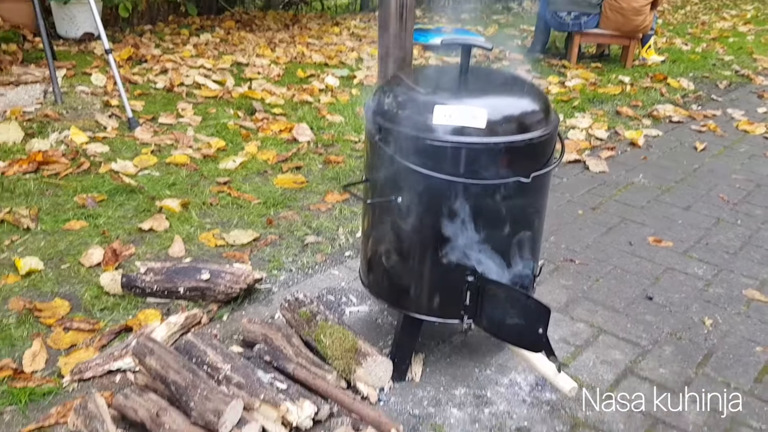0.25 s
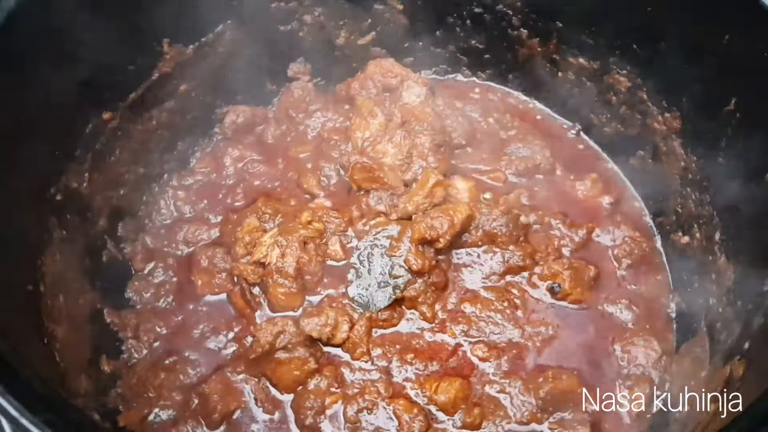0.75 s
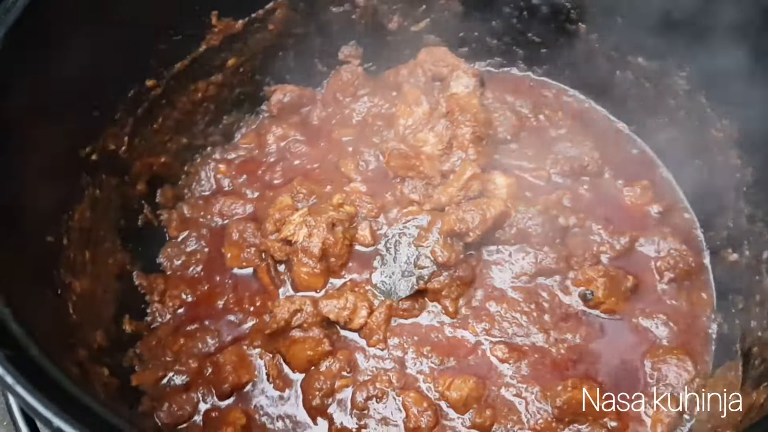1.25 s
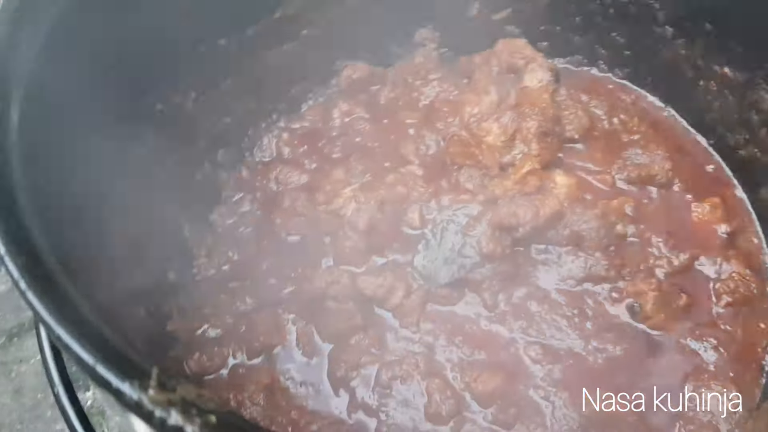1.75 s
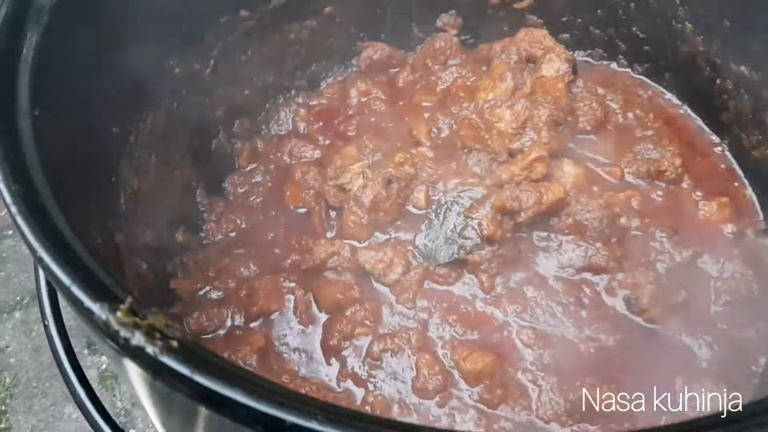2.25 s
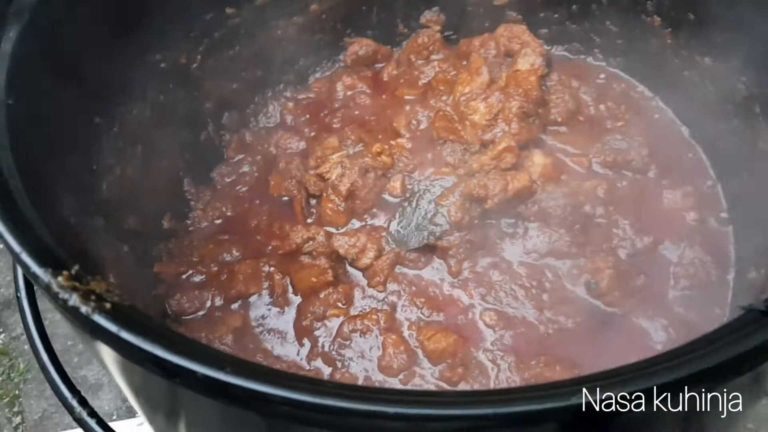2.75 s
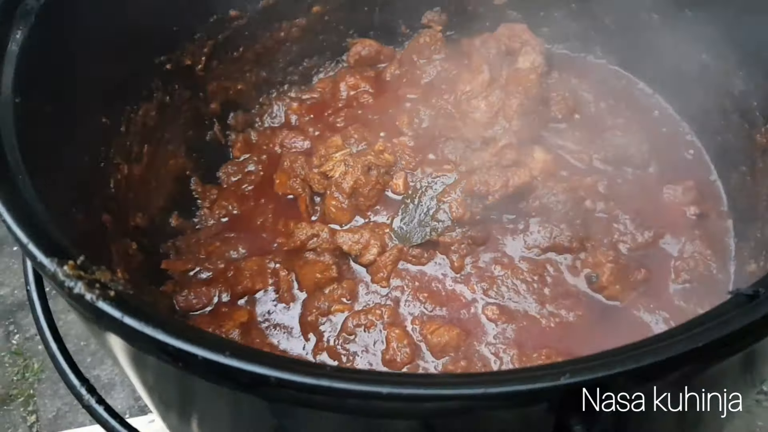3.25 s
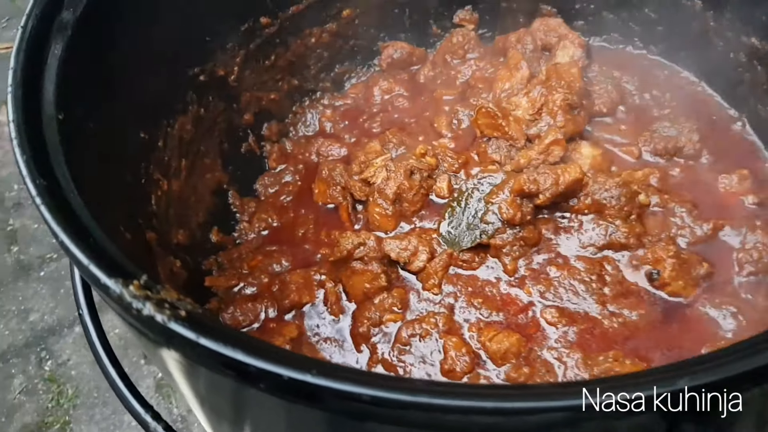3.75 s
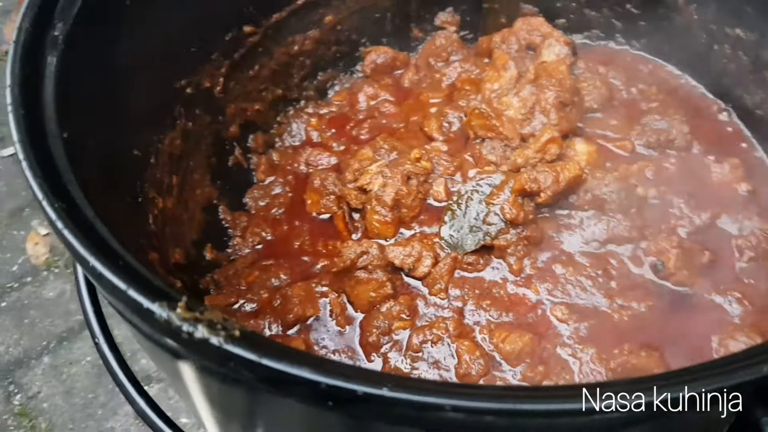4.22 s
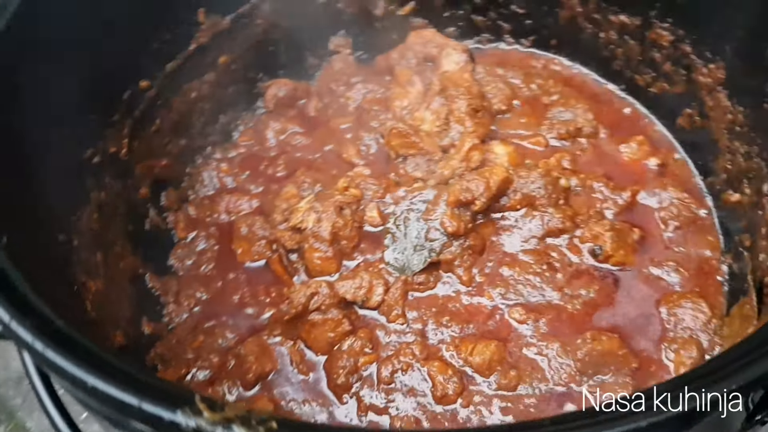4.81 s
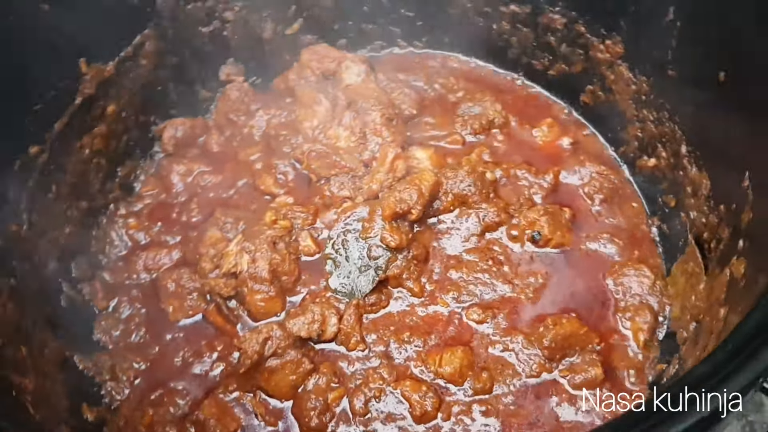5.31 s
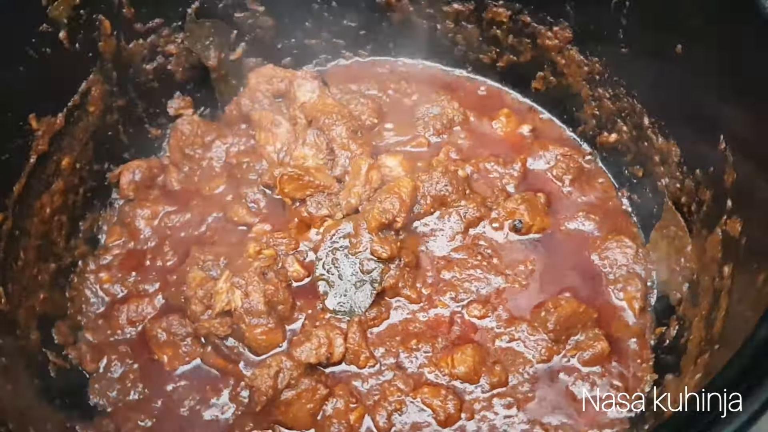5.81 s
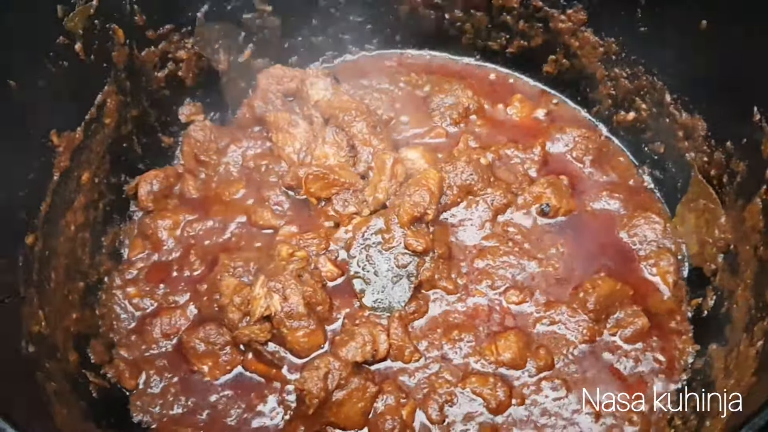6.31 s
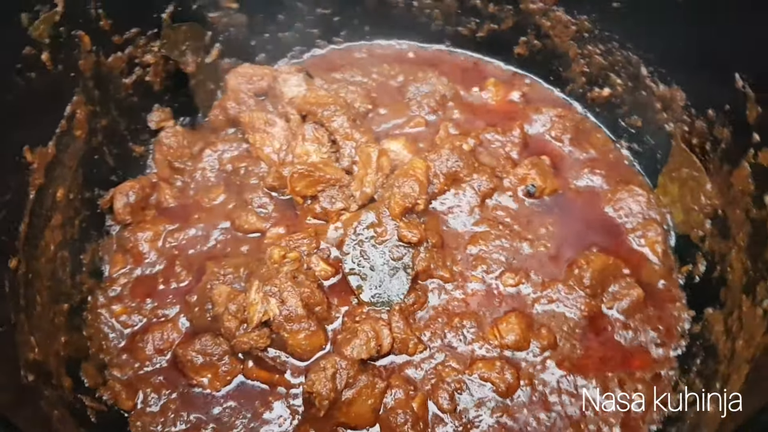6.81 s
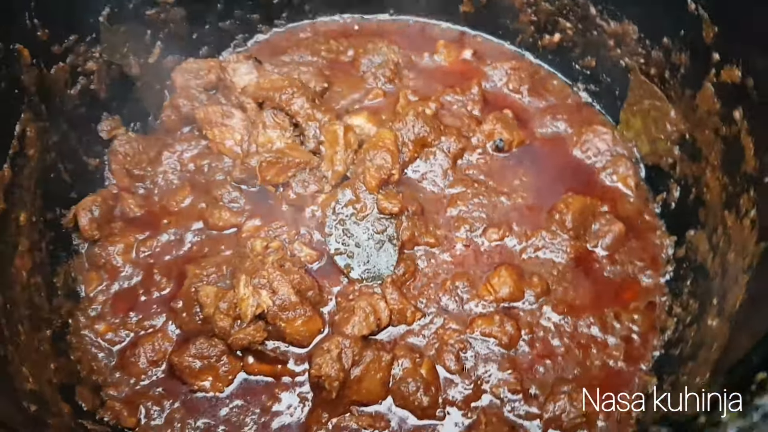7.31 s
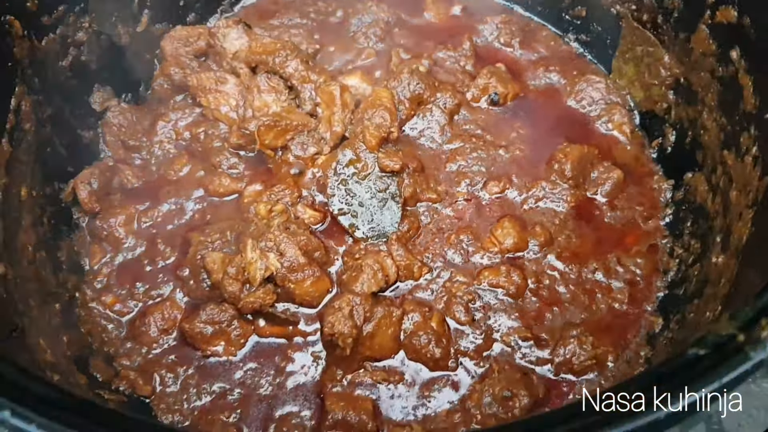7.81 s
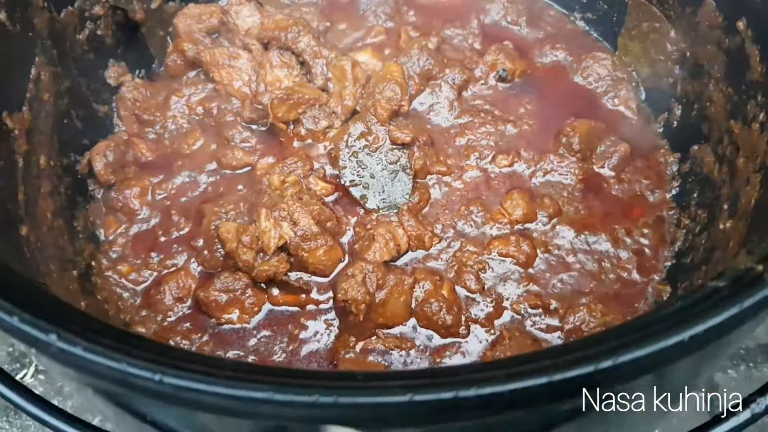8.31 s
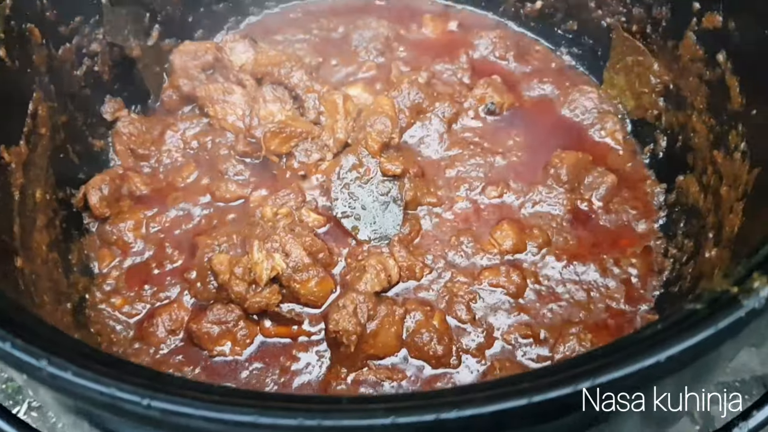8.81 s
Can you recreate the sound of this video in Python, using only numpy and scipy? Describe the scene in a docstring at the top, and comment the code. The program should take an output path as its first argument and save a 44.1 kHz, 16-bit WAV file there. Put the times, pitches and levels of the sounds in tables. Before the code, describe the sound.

A faint low rumble and a brief scratchy two-stroke creak open, cut by a tiny silence. Close, crackling sizzle with sharp spits swells for about a second, ending in a heavy steamy burst. Then thick stew bubbles slowly in a deep pot, each bubble a wet plop with a dull puff and a soft blip. A faint gurgle and hiss continue beneath. Outdoors, very close stereo microphone, buffeted by steam.

```python
"""Large bubbles burst about twice a second in a big pot of thick stew outdoors: skin tears with wet plops and splutter,
steam puffs out as noise that brightens with its flow, a duller wake buffets mostly the right microphone port, a vent plips.
Behind them a band-noise and bubble-pop simmer murmurs and sizzles, with frying swells on the hot wall and ringing spits.
A short creak of stick-slip clicks over a low rumble comes first, then a close flare of sizzling and a brief silence."""
import sys
import numpy as np
from scipy import signal
from scipy.io import wavfile
from scipy.ndimage import uniform_filter1d, minimum_filter1d

SR = 44100
rng = np.random.default_rng(int(sys.argv[2]) if len(sys.argv) > 2 else 0)


def transcribe(u):
    """Save the signal u as a 16-bit wav file named by the first command-line argument.

    u: samples, shape (n,) or (channels, n), limited to [-1, 1]; the rate is SR.
    q: integer samples, one column per channel.
    """
    v = np.clip(np.atleast_2d(u).T, -1, 1)
    q = np.round(v * 32767).astype(np.int16)
    wavfile.write(sys.argv[1], SR, q)


N = 399590

# brief silence, with every sound muted: [start t/s, end t/s]
PAUSE = (.569, .595)
# bursting bubbles: [peak t/s, puff level/dB, brightness f/Hz, swell t/s, low thump level/dB,
# left-right level/dB, wake level/dB]
BURSTS = [(1.458, -9.5, 790, 0.0091, 12, -42.5, -33), (2.836, -15, 921, 0.026, 3, 5.5, -34),
          (3.319, -25.5, 564, 0.023, 9.5, 2, -39), (3.719, -19.5, 1158, 0.012, -9.5, 1, -27),
          (4.209, -41.5, 1050, 0.011, -2, -25, -67), (5.143, -25.5, 634, 0.021, 13, 2.5, -45),
          (5.489, -32.5, 560, 0.018, 25.5, 2.5, -61), (5.905, -35, 1010, 0.017, 13, -9, -38.5),
          (6.356, -16.5, 824, 0.024, 2.5, -1, -33), (6.73, -28, 400, 0.048, 9, -4.5, -30.5),
          (7.177, -26.5, 437, 0.019, 10.5, 0, -41.5), (7.61, -31, 570, 0.016, 6.5, 30, -42.5),
          (8.0, -43.5, 390, 0.023, 20, -11, -45.5), (8.414, -17, 890, 0.015, 15, 3.5, -22),
          (8.846, -22.5, 1020, 0.017, -15, 25.5, -43.5)]


def from_db(db):
    """Decibels to gain."""
    return 10 ** (np.asarray(db) / 20)


def rms_one(x):
    """Scale to rms 1."""
    return x / np.sqrt(np.mean(x ** 2) + 1e-20)


def in_time(rows):
    """The columns of a curve at every sample."""
    s, *columns = np.transpose(rows)
    return [np.interp(np.arange(N) / SR, s, column) for column in columns]


def at_hz(points, hz):
    """Read a spectrum on a log-frequency axis."""
    point_hz, values = np.array(points)[:, 0], np.array(points)[:, 1]
    return np.interp(np.log(hz), np.log(point_hz), values)


def panned(pan_db):
    """Left and right gains of constant power; positive leans left."""
    return rms_one(from_db(np.array([[.5], [-.5]]) * pan_db))


def drift(rate, size=N):
    """Slow random wandering of rms 1: noise through a two-pole low-pass at the rate (Hz), one point per 20 samples."""
    r = np.exp(-40 * np.pi * rate / SR)
    noise = rng.standard_normal(size // 20 + 2002)
    slow = signal.lfilter([1], [1, -2 * r, r * r], noise)[2000:]  # skip the filter's start
    return np.interp(np.arange(size) / 20, np.arange(len(slow)), rms_one(slow))


def ring(clicks, hz, t60):
    """A resonance: a unit click sets a sine ringing from height 1, down 60 dB after t60 (s)."""
    r, w = from_db(-60 / (t60 * SR)), 2 * np.pi * hz / SR
    return signal.lfilter([0, np.sin(w)], [1, -2 * r * np.cos(w), r * r], clicks + 1e-18)


def cut(x, hz, kind, order=2):
    """Butterworth low-, high- or band-pass."""
    return signal.sosfilt(signal.butter(order, hz, kind, fs=SR, output="sos"), x)


def held(start, end, attack, release):
    """An envelope that rises to 1, holds until its end and dies away exponentially (all in s)."""
    t = np.arange(N) / SR
    return np.clip((t - start) / attack, 0, 1) * np.exp(-np.clip((t - end) / release, 0, 20))


def add(out, s, sound):
    """Mix a short stereo sound in at its time."""
    at = round(s * SR)
    out[:, at:at + sound.shape[1]] += sound[:, :N - at]


def noise_bands(low_hz, count):
    """Half-octave bands taken in turn from two unrelated stereo noises, power 1 per kHz: (centre Hz, noise)."""
    white = rng.standard_normal((2, 2, N)) * np.sqrt(SR / 2000)
    for k in range(count):
        low = low_hz * 2 ** (k / 2)
        high = min(low_hz * 2 ** ((k + 1) / 2), SR / 2 - 10)
        yield np.sqrt(low * high), cut(white[k % 2], [low, high], "band", order=3)


def crackle(per_s, spread_db, low_hz, high_hz, cycles, clump_db):
    """Tiny bubbles pop at random, in clumps, with uneven sizes and 20 pitches, each ringing for some cycles; rms 1."""
    at = np.flatnonzero(rng.random(N) < per_s * from_db(clump_db * drift(5)) / SR)
    sizes = from_db(spread_db * np.minimum(rng.exponential(1, len(at)), 4))
    sizes = sizes * rng.choice([-1, 1], len(at))
    dealt = rng.integers(0, 20, len(at))  # which pitch each pop gets
    out = np.zeros(N)
    for k, hz in enumerate(np.geomspace(low_hz, high_hz, 20)):
        clicks = np.zeros(N)
        clicks[at] = sizes * (dealt == k)
        out += ring(clicks, hz, cycles / hz)
    return rms_one(cut(out, low_hz, "high", order=1))


def hollow(x):
    """The air in the pot rings along: resonant peaks are added to whatever sounds inside it."""
    # resonances of the pot's air: [f/Hz, width f/Hz, level/dB against the direct sound]
    air_modes = [(376, 240, -3.5), (1068, 38, -9.5), (1880, 11, -6.5)]
    out = x
    for hz, width, db in air_modes:
        out = out + from_db(db) * signal.lfilter(*signal.iirpeak(hz, hz / width, fs=SR), x)
    return out


def fire():
    """A low band-noise rumble at the start, probably the draught of the wood fire under the pot."""
    rumble = rms_one(cut(rng.standard_normal((2, N)), [65, 190], "band"))
    # holds until the brief silence, then fades
    return from_db(-47) * rumble * held(0, PAUSE[0], attack=1 / SR, release=0.34)


def wash(spectrum, pan, bands, patchy_db, rate):
    """Stereo noise shaped band by band, each band flickering on its own; rms 1."""
    # how alike the two microphone ports hear: [f/Hz, likeness 0-1]
    port_likeness = [(60, 0.97), (130, 0), (290, 0.98), (3100, 0)]
    out = 0
    for hz, (mid, side) in bands:
        alike = np.clip(at_hz(port_likeness, hz), -1, 1)
        gain = from_db(at_hz(spectrum, hz) + patchy_db * drift(rate)) * panned(at_hz(pan, hz))
        stereo = np.sqrt(1 + alike) * mid + np.sqrt(1 - alike) * side * [[1], [-1]]
        out = out + gain * stereo
    return rms_one(out)


def simmer(bands):
    """A gurgling murmur from deep in the pot and a sizzle of fine bubbles on the hot wall, with one close flare."""
    # level of the simmer: [t/s, level/dB]
    simmer_level = [(0, 4.5), (1.45, 10), (1.7, -2.5), (3.7, -7.5), (4.3, -0.5), (4.9, -4), (5.3, 4.5),
                    (8.3, 5.5)]
    # spectra of murmur and hiss: [f/Hz, level/dB per Hz, relative]
    murmur_spectrum, hiss_spectrum = [(30, -4.5), (64, 12.5), (216, -2.5), (673, -11.5), (1345, -18.5)], [(1900, -6.5), (2700, -9), (3800, -3), (5400, -4.5),
                                                      (10800, -13.5), (15200, -7.5)]
    # where they lie between the ports: [f/Hz, left-right level/dB]
    murmur_pan, hiss_pan = [(60, -8), (200, 1), (500, 3), (1500, 1.5)], [(2700, -0.5), (4400, 10), (7600, 31.5), (10800, 25.5),
                                                (15000, -1.5)]
    murmur_db, sizzle_db, near_db = -59.5, -72.5, -79  # where the level curve reads 0 dB
    flare_db = -57

    murmur = wash(murmur_spectrum, murmur_pan, bands[:12], patchy_db=2, rate=20)
    gurgle = crackle(per_s=61, spread_db=3.0, low_hz=295.5, high_hz=800, cycles=31, clump_db=3.5)
    deep = hollow(murmur + from_db(-9.5) * gurgle)

    highs = wash(hiss_spectrum, hiss_pan, bands[12:], patchy_db=1, rate=20)
    ticks = crackle(per_s=270, spread_db=4.5, low_hz=4640, high_hz=13800, cycles=20.0, clump_db=3.5)
    hiss = from_db(-1.13 + 2.0 * drift(7.2)) * highs + from_db(-4.5) * ticks * panned(42)
    far = crackle(per_s=260, spread_db=11.5, low_hz=3200, high_hz=5000, cycles=18, clump_db=4.0)
    far = from_db(-7.0 + 2.0 * drift(21)) * far * panned(3.8)
    near = crackle(per_s=3000, spread_db=5.5, low_hz=2050, high_hz=8400, cycles=16, clump_db=3.5) * panned(44.0)
    sizzle = from_db(sizzle_db) * (hiss + far) + from_db(near_db) * near

    coarse = crackle(per_s=1100, spread_db=0.0, low_hz=700, high_hz=3200, cycles=3.1, clump_db=2.0) * panned(9.3)
    flare = held(start=0.56, end=1.5, attack=0.13, release=0.013) * from_db(flare_db + 3.5 * drift(30))
    steady = from_db(murmur_db) * deep + sizzle
    return from_db(in_time(simmer_level)[0]) * steady + flare * (near + from_db(-5.0) * coarse)


def swells(pan_db=1.0, half_s=0.12):
    """Patches of dense frying come and go in bell-shaped swells where the sauce wets the hot wall."""
    # sauce washing up the wall: [peak t/s, level/dB]
    washes_up = [(6.15, -66.5), (6.92, -68), (8.25, -66.5)]
    t = np.arange(N) / SR
    wetted = 0
    for s, db in washes_up:
        wetted = wetted + from_db(db) * np.exp(-np.minimum(((t - s) / half_s) ** 2, 20))
    frying = crackle(per_s=990, spread_db=5.5, low_hz=2215, high_hz=4530, cycles=62, clump_db=4.5)
    return wetted * cut(frying, 4300, "low", order=4) * panned(pan_db)


def creak(uneven_db=1.5, pan_db=22.0):
    """Stick-slip: two strokes of sharp slips ring a few modes, with a short squeal at the start and a few late jolts."""
    # strokes: [start t/s, end t/s, unevenness of the slips 0-1, level/dB]
    strokes = [(0.158, 0.383, .2, -48), (0.412, 0.568, .3, -50.5)]
    # speed: [t/s, slip rate f/Hz]
    slip_rate = [(.19, 290), (.275, 205), (.37, 190), (.4, 130), (.56, 190)]
    # what the creak rings with: [f/Hz, level/dB, 60 dB decay t/s]
    creak_modes = [(2300, 9, 0.0076), (2800, 17, 0.0011), (3930, 4.5, 0.0082), (6250, 0.5, 0.0043)]
    # harder slips at the end: [t/s, level/dB]
    hard_slips = [(0.471, -27.5), (.541, -25), (0.559, -27.5)]

    t, slips = np.arange(N) / SR, np.zeros(N)
    for start, end, jitter, db in strokes:
        per_s = in_time(slip_rate)[0] * np.exp(jitter * drift(70))
        clicks = np.diff(np.floor(np.cumsum(per_s) / SR), prepend=0)  # one click per whole cycle
        slips += from_db(db) * (t > start) * (t < end) * clicks
    body = 0
    for k, (hz, mode_db, t60) in enumerate(creak_modes):
        struck = slips * from_db(mode_db + uneven_db * drift(55))
        body = body + (-1) ** k * ring(struck, hz, t60)
    body = cut(cut(body, 8300, "low", order=6), 1550, "high", order=6)

    squeal = np.sin(2 * np.pi * np.cumsum(1100 * (1 + 0.044 * drift(110))) / SR)
    squeal = squeal * from_db(-46.5) * held(start=0.153, end=0.16, attack=0.0082, release=0.077)

    jolts = np.zeros(N)
    for s, jolt_db in hard_slips:
        jolts[round(s * SR)] = from_db(jolt_db)
    knocks = ring(jolts, 630, 0.006) + ring(jolts, 5500, 0.00077)
    return (body + knocks) * panned(pan_db) + squeal


def spits(hz=3700, pitch_spread=0.099, cycles=8.6, clicks_per_s=900, splutter_s=0.012, after_share=0.41, pan_db=23.0):
    """A droplet snaps on the hot metal and scatters smaller snaps, ringing at three pitches around one of its own."""
    # sauce spitting on the hot wall: [t/s, level/dB]
    droplets = [(.803, -37), (.921, -31.5), (0.988, -35.5), (1.034, -32), (1.111, -37), (1.174, -32.5),
                (1.2335, -34), (1.318, -33.5), (2.246, -49.5), (4.069, -48.5), (4.296, -50.5), (5.332, -50),
                (5.901, -37), (6.087, -45), (6.533, -38), (7.601, -43.5), (8.133, -44), (8.363, -43),
                (8.795, -46)]
    out, t = np.zeros((2, N)), np.arange(SR // 20) / SR
    for s, db in droplets:
        burst = 0
        for pitch in hz * np.exp(pitch_spread * (rng.standard_normal() + np.arange(-1, 2))):
            scattered = (rng.random(len(t)) < clicks_per_s / SR) * rng.standard_normal(len(t))
            clicks = after_share * scattered * np.exp(-t / splutter_s)
            clicks[rng.integers(SR // 1000)] = 1  # the first snap, within 1 ms
            burst = burst + ring(clicks, pitch, cycles / pitch)
        add(out, s, from_db(db) * burst / np.abs(burst).max() * panned(pan_db))
    return out


def pop(hz, decay, rise=0.35, wobble=0.073, tear=.42, tear_reach=1.21, attack=0.00063):
    """A cavity opens: it rings for a few cycles, wobbling and rising in pitch, with a rasp of torn sauce."""
    t = np.arange(SR // 20) / SR
    pitch = hz * np.exp(rise * (np.tanh(t / decay / 2) - .5) + wobble * drift(270, size=len(t)))
    tone = np.sin(2 * np.pi * np.cumsum(pitch) / SR)
    rasp = cut(rng.standard_normal((2, len(t))), tear_reach * hz, "low", order=3)
    rasp = rms_one(cut(rasp, hz / 2, "high"))
    envelope = (1 - np.exp(-t / attack)) * np.exp(-t / decay)
    return envelope * (tone + tear * rasp)


def plips(hz=1050, decay_s=0.0017, pitch_spread=0.14, wall_share=0.028, wall_s=0.015, pan_db=4.5):
    """The closing vent gives a short soft blip, each at its own pitch, smeared by reflections from the pot wall."""
    # vents slapping shut after a burst: [t/s, level/dB]
    closings = [(1.619, -39), (1.645, -34.5), (3.4525, -39.5), (5.1905, -23.5), (5.613, -31), (6.04, -30.5),
                (6.464, -25.5), (6.873, -23.5), (7.299, -25), (7.7158, -26), (8.1472, -25.5), (8.563, -31),
                (8.9871, -33)]
    out = np.zeros((2, N))
    for s, db in closings:
        pitch = hz * np.exp(pitch_spread * rng.standard_normal())
        add(out, s, from_db(db) * pop(pitch, decay_s))
    t = np.arange(SR // 20) / SR
    echoes = rng.standard_normal((2, len(t))) * np.exp(-t / wall_s)
    reflected = signal.fftconvolve(out, echoes, axes=1)[:, :N]
    return (out + wall_share * reflected) * panned(pan_db)


def splutter(per_s=330, spread_db=4.0, spray_db=-22.5, reach_swells=1.44, release_s=0.005):
    """Wet tearing of each bubble's skin: short pops and finer spray that stop abruptly when the vent empties."""
    opened = 0
    for s, db, bright_hz, swell, _, pan_db, _ in BURSTS:
        strength = from_db(db - 25) * (bright_hz / 740) ** 2.6  # brighter puffs splutter more
        reach = reach_swells * swell  # either side of the puff's peak
        vent = held(s - reach, s + reach, swell, release_s)
        opened = opened + strength * vent * panned(pan_db)
    pops = crackle(per_s, spread_db, low_hz=800, high_hz=2070, cycles=5.5, clump_db=0)
    spray = crackle(2 * per_s, spread_db, low_hz=2200, high_hz=4780, cycles=10, clump_db=-0.5)
    wet = cut(pops, 1700, "low") + from_db(spray_db) * spray
    return opened * cut(wet, 6500, "low", order=4)


def plops(decay_s=0.0041, snap_db=-31.0, snap_follows=.55, snap_hz=2300, snap_s=0.0045):
    """Each tear in a skin is a ringing plop with a softer wet noise snap, on its bubble's side."""
    # skin tearing open, sometimes more than once per bubble: [t/s, level/dB, pitch f/Hz]
    tears = [(1.4545, -3, 723), (1.492, -15, 646), (2.785, -36, 700), (2.805, -12, 453), (2.8315, -8, 424),
             (2.872, -18, 800), (3.3095, -28.5, 766), (3.7127, -4.5, 461), (3.76, -22.5, 800),
             (4.2054, -30.5, 700), (5.487, -22, 640), (5.8955, -25, 790), (6.311, -32.5, 1100),
             (6.3462, -16, 726), (7.601, -32, 700), (8.4013, -14.5, 647), (8.416, -16.5, 543),
             (8.8332, -9, 380), (8.856, -18, 1134)]
    out, t = np.zeros((2, N)), np.arange(SR // 20) / SR
    burst_s, *_, pan_db, _ = np.transpose(BURSTS)
    for s, db, hz in tears:
        spray = cut(rng.standard_normal((2, len(t))), snap_hz, "low", order=3)
        spray = rms_one(cut(spray, snap_hz / 2, "high"))
        # small tears have relatively more snap, though the plop stays louder
        snap = from_db(snap_db + snap_follows * db) * spray * np.exp(-t / snap_s)
        cavity = from_db(db) * cut(pop(hz, decay_s), 2 * snap_hz, "low", order=3)
        nearest = np.argmin(np.abs(burst_s - s))
        add(out, s, (snap + cavity) * panned(pan_db[nearest]))
    return out


def jet(bands, s, db, bright_hz, swell, fade, thump_db, pan_db,
        dulling=0.29, slope=6.93, finest=2.6, thump_hz=135, eddy_db=3.0, eddy_rate=110, abrupt=1.52):
    """A jet of steam swells and fades; the faster it flows, the finer its eddies and the brighter it is."""
    out = np.zeros((2, N))
    span = slice(int((s - .2) * SR), min(int((s + .35) * SR), N))
    t = np.arange(N)[span] / SR - s
    decay = np.where(t < 0, np.abs(t / swell) ** abrupt, t / fade)
    flow_db = -20 / np.log(10) * np.minimum(decay, 20)  # exp(-decay) in dB
    # each microphone port meets its own eddies
    eddies = eddy_db * np.array([drift(eddy_rate, size=SR)[:len(t)] for port in range(2)])
    corner = bright_hz * from_db(dulling * flow_db + eddies * .5)
    strength = from_db(db + flow_db + eddies) * panned(pan_db)
    dull = corner ** -slope
    for hz, noise in bands:
        thump = from_db(thump_db / (1 + (hz / thump_hz) ** 7.9))
        # the spectrum falls past the corner, and faster still past the finest eddies
        loss = (1 + hz ** slope * dull) * (1 + (hz / (finest * corner)) ** 2)
        out[:, span] += noise[:, span] * strength * thump / np.sqrt(loss)
    return out


def puffs(bands, fade_per_swell=0.95, gust_hz=190):
    """Steam jets: each burst leaks a little, then puffs and trails a slower wake; a few dull gusts hit the ports."""
    # steam blowing straight onto a microphone port:
    # [peak t/s, level/dB, swell t/s, low thump level/dB, left-right level/dB]
    gusts = [(1.068, -37, 0.032, 16, -36), (1.426, -22.5, 0.025, 22.5, -38), (1.484, -6.5, 0.013, 10, -41),
             (1.595, -12, 0.011, -6, 20), (4.599, -53, 0.032, 22.5, -6), (8.812, -7.5, 0.011, -0.5, -11.5)]
    wake_thump_db = np.array([[-6], [15]])  # left, right: it buffets mostly the right port
    out = np.zeros((2, N))
    other_eddies = [(hz, noise[:, ::-1]) for hz, noise in bands]  # the same noise backwards
    for s, db, bright_hz, swell, thump_db, pan_db, wake_db in BURSTS:
        out += jet(bands, s, db, bright_hz, swell, fade_per_swell * swell, thump_db, pan_db)
        # soft, thin leak ahead of the puff
        out += jet(other_eddies, s - 0.041, db - 41.5, 1200, 2 * swell, swell, thump_db=0, pan_db=0)
        # duller wake after it
        out += jet(other_eddies, s + 0.04, wake_db, 0.53 * bright_hz, swell=0.037, fade=0.051,
                   thump_db=wake_thump_db, pan_db=-1.5)
    for s, db, swell, thump_db, pan_db in gusts:
        out += jet(bands, s, db, gust_hz, swell, fade_per_swell * swell, thump_db, pan_db)
    return cut(out, 28, "high")


def dip_behind(loud, threshold_db=-24.5, depth=0.38, recovery_db_per_s=38.0):
    """A gain that drops as soon as a burst is loud and then creeps back; depth scales both the drop and the recovery."""
    t = np.arange(N) / SR
    power = uniform_filter1d(np.mean(loud ** 2, axis=0), size=441)  # over 10 ms
    level_db = 10 * np.log10(np.abs(power) + 1e-12)
    over_db = np.maximum(level_db - threshold_db, 0)
    recovery = recovery_db_per_s * t
    held_over_db = np.maximum.accumulate(over_db + recovery) - recovery
    return from_db(-depth * held_over_db)


def scene():
    """All sources together, with one brief silence; the simmer dips behind the loudest bursts."""
    t = np.arange(N) / SR
    bands = list(noise_bands(25, count=19))
    sounding = uniform_filter1d(1.0 * ((t < PAUSE[0]) | (t > PAUSE[1])), size=60)
    bubbles = hollow(puffs(bands) + plops() + plips()) + splutter()
    background = fire() + dip_behind(bubbles) * simmer(bands) + swells()
    return (background + creak() + spits() + bubbles) * sounding


def record(dry):
    """A fast limiter holds the strongest peaks at full scale, then a steep low-pass cuts the top."""
    needed = 1 / np.maximum(np.abs(dry), 1)
    gain = uniform_filter1d(minimum_filter1d(needed, size=221), size=221)  # 5 ms windows
    low_pass = signal.ellip(10, .1, 80, 15900, fs=SR, output="sos")
    return signal.sosfilt(low_pass, dry * gain)


dry = scene()
out = record(dry)
transcribe(out)
```